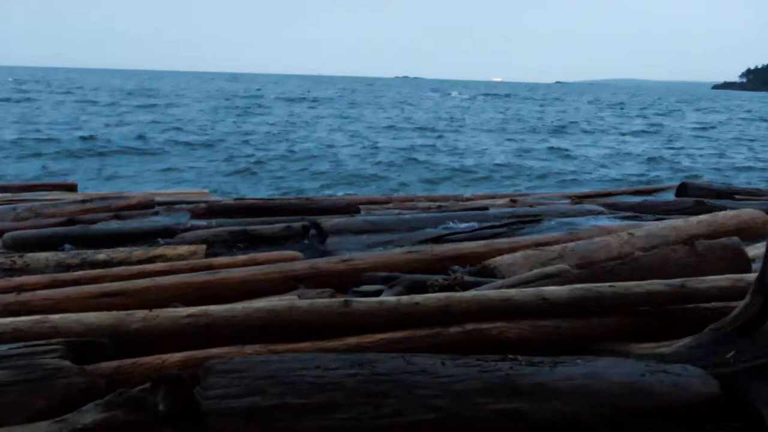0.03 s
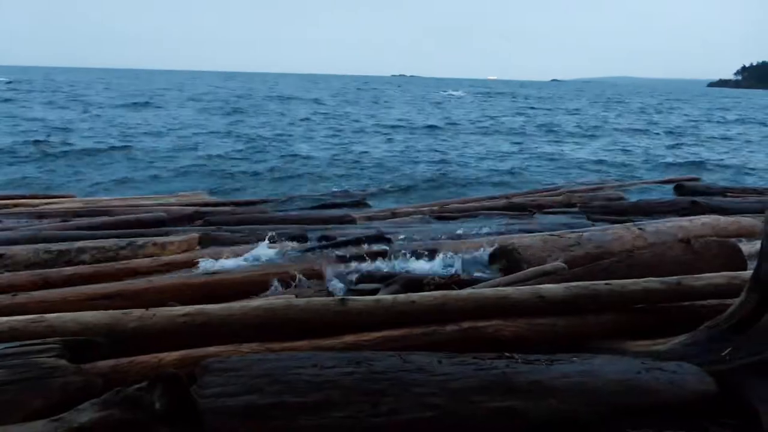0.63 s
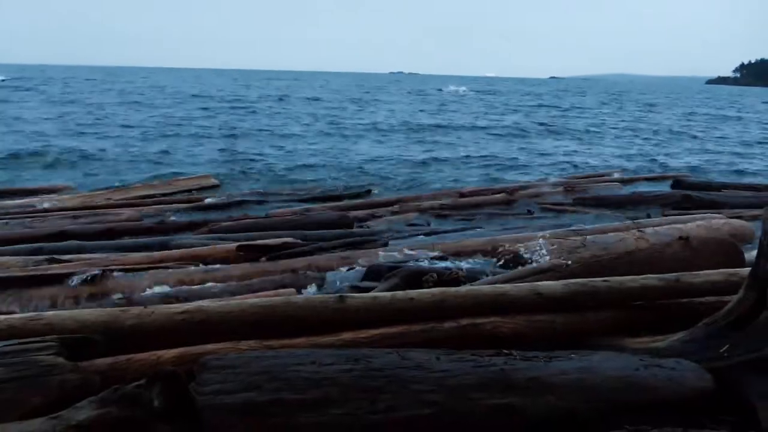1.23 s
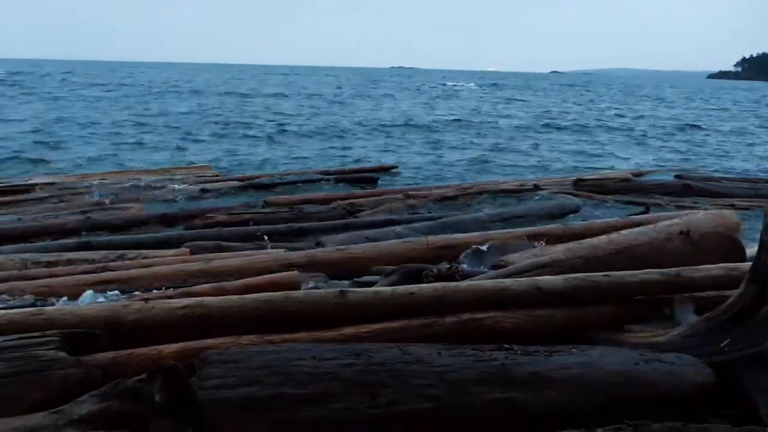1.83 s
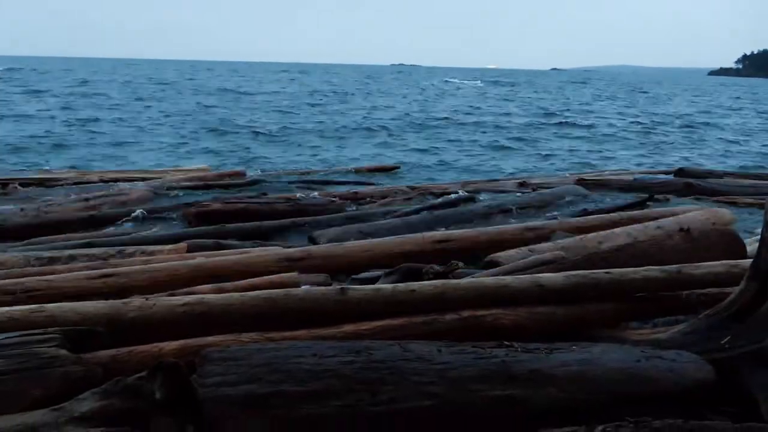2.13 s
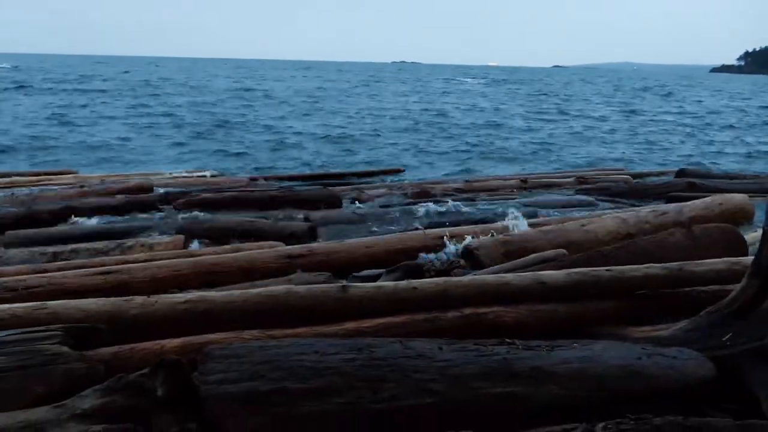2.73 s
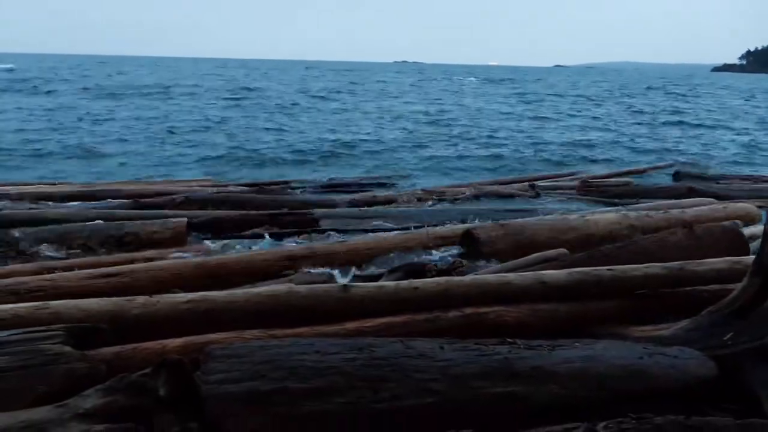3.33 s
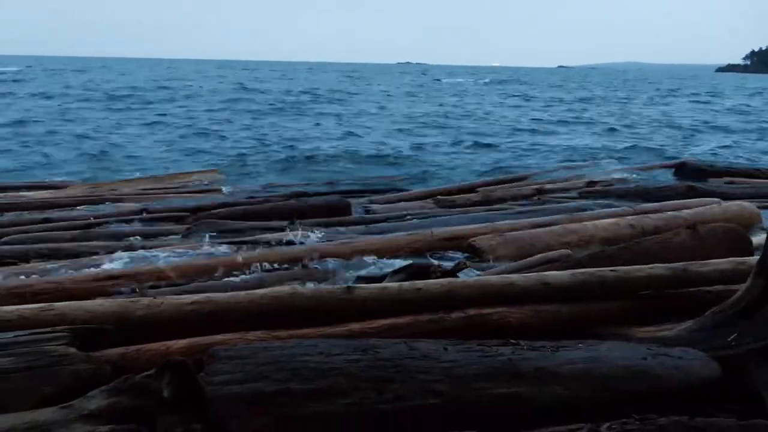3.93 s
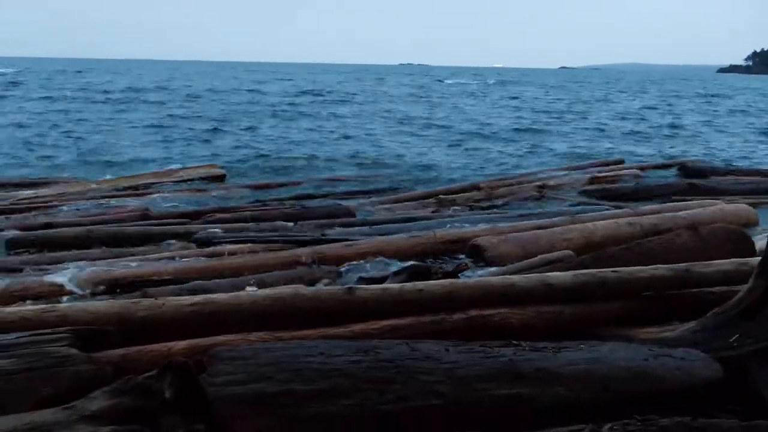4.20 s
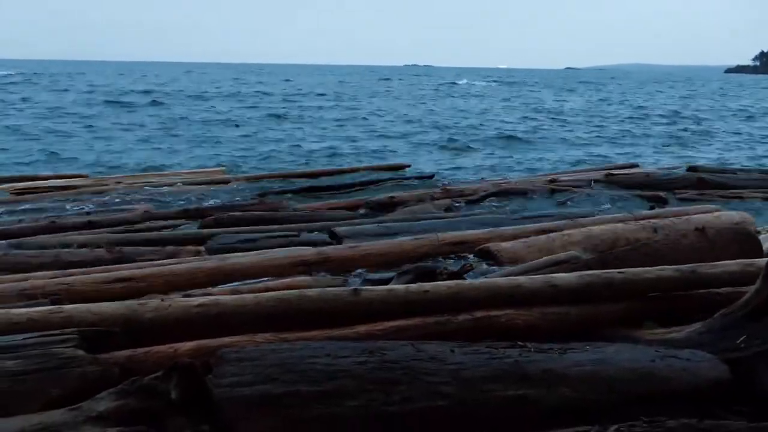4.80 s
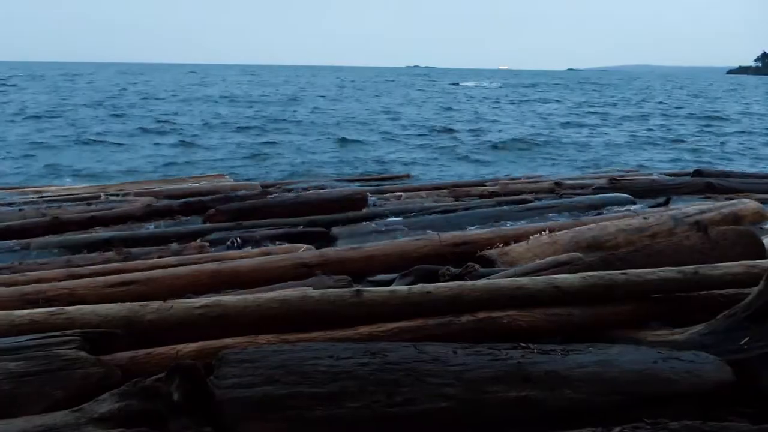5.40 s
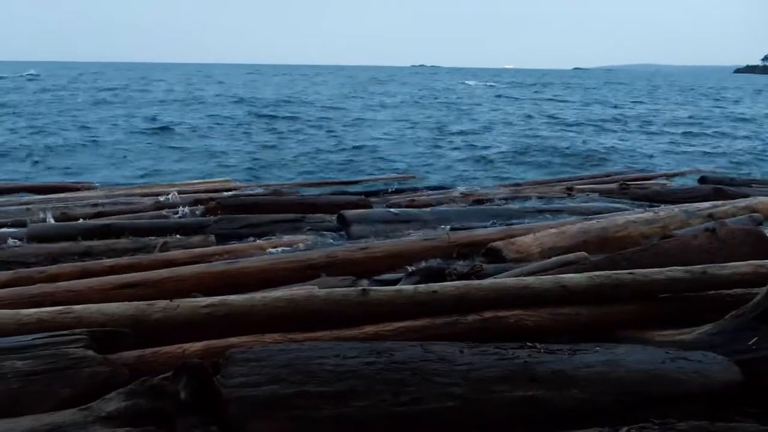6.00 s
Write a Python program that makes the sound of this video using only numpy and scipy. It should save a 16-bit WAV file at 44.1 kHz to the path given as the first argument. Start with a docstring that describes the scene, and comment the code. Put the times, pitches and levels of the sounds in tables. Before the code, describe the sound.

Choppy sea churns and bubbles through a raft of drift logs on a windy shore. The wash swells with several small waves, the first the strongest, each leaving a fizz of foam. Water slaps hollowly against the trunks, with a few small drips and thin spits of spray, busiest around the middle. Wind flutters on the stereo microphone throughout, with irregular dull low thumps.

```python
"""On a windy shore, choppy sea washes through a raft of drift logs, heard from half a second in.
Wind eddies thump on the microphone ports. Thrown drops ring small bubbles, spray hisses, and waves
slap the trunks, made hollow by the echo off the next log. The water itself churns, bubbles and fizzes:
turbulent noise mixed with damped bubble resonances, swelling with each wave.
The camera's frequency response cuts three narrow notches into the whole sound."""
import sys
import numpy as np
from scipy import signal
from scipy.fft import rfft, irfft, next_fast_len
from scipy.io import wavfile
from scipy.ndimage import uniform_filter1d, map_coordinates

SR = 44100
rng = np.random.default_rng(int(sys.argv[2]) if len(sys.argv) > 2 else 0)


def unload_audio(sound):
    """Save the sound as a 16-bit wav file, at the path given as the first command line argument."""
    columns = np.transpose(np.atleast_2d(sound))
    # keep every value between -1 and 1, then stretch to whole-number steps
    steps = np.round(np.clip(columns, -1, 1) * 32767)
    wavfile.write(sys.argv[1], SR, steps.astype(np.int16))


N = 271215
TIME = np.arange(N) / SR


def amp(db):
    """Decibels to amplitude ratio."""
    return 10 ** (np.asarray(db) / 20)


def unit(x):
    """Normalisation to rms 1."""
    return x / np.sqrt(np.mean(x ** 2) + 1e-20)


def along(points, hz):
    """Interpolation of (frequency [Hz], value) points on a logarithmic frequency axis."""
    freqs, values = np.transpose(points)
    return np.interp(np.log(hz + 1), np.log(freqs + 1), values)


def wobble(rate):
    """Smooth random modulation: a spline through `rate` Gaussian knots a second."""
    knots = rng.standard_normal(int(N * rate / SR) + 4)
    return map_coordinates(knots, [TIME * rate])


def filtered(x, response):
    """Linear filtering: the spectrum of x times a frequency response."""
    size = next_fast_len(N + SR // 2)
    return irfft(rfft(x, size) * response(np.fft.rfftfreq(size, 1 / SR)), size)[..., :N]


def panned(lr_db):
    """Intensity stereo: left and right gains for a level difference."""
    return amp(np.array([lr_db, -lr_db]) / 2).reshape(2, -1)


def add(out, start, sound):
    """Superposition of a sound from `start` seconds on."""
    part = out[:, round(start * SR):][:, :sound.shape[-1]]
    part += sound[..., :part.shape[-1]]


def patchy(depth_db):
    """Spectral modulation: two noises whose level varies in patches of time and frequency."""
    spectra = signal.stft(rng.standard_normal((2, N)), nperseg=512)[2]
    patches = uniform_filter1d(rng.standard_normal(spectra.shape[1:]), size=8, axis=0)
    patches = uniform_filter1d(patches, size=7, axis=1)
    return unit(signal.istft(spectra * amp(depth_db * unit(patches)), nperseg=512)[1][:, :N])


def spread(pair, spectrum, coherence):
    """Mid-side mixing: two unrelated signals become coloured, partly coherent stereo of rms 1."""
    def response(hz):
        angle = np.arccos(np.clip(along(coherence, hz), -1, 1)) / 2
        return amp(along(spectrum, hz)) * np.array([np.cos(angle), np.sin(angle)])
    mid, side = filtered(pair, response)
    return unit(np.array([mid + side, mid - side]))


# strength of the wind on the ports (time [s], level [dB])
WIND_LEVELS = [(0.5, -31), (0.68, -24.5), (1.05, -27), (1.85, -25), (2.05, -29.5), (2.15, -25),
               (2.23, -30.5), (2.33, -31.5), (2.42, -21.5), (2.55, -29.6), (2.73, -24.5), (2.98, -27.5),
               (3.03, -31.3), (3.53, -26), (5.78, -28.9), (5.83, -25.9), (6.1, -32.5), (6.15, -30)]
# spectrum of its buffeting (frequency [Hz], relative density [dB])
WIND_SPECTRUM = [(25, -34), (50, -20), (85, -5), (130, 2.5), (220, 1), (310, -0.5), (370, -5.5), (460, -10),
                 (550, -23), (800, -19.5), (2000, -64)]
# likeness of left and right (frequency [Hz], coherence [0-1])
WIND_COHERENCE = [(30, .4), (80, 0.84), (200, 0.88), (400, 0.58)]
# strong eddies (time [s], envelope peak [dB], frequency [Hz], left minus right [dB])
EDDIES = [(1.3, -13, 226, -7), (1.499, -15, 174, -3), (1.585, -19, 264, -5), (1.759, -17.5, 215, 1),
          (1.851, -18.5, 220, -12), (2.025, -17.5, 215, 8), (2.142, -18.5, 264, -14),
          (3.249, -16.5, 170, 5), (3.533, -14.5, 170, 4), (3.822, -17.5, 230, .5), (4.212, -10, 266.6, 3),
          (4.319, -19, 271, 2), (4.554, -11, 270, 0), (4.783, -21.5, 203, 0), (5.024, -17.5, 275, -3),
          (5.203, -18, 285, 5), (5.285, -17, 230, -11.5), (5.474, -20, 202, 9), (5.566, -16, 150, 3),
          (5.939, -14.5, 200, -8)]


def wind():
    """Turbulent pressure flutters on the ports; each strong eddy is a dull thump that drags a wake."""
    wake_db, wake_lag_s, wake_half_width_s = -27.5, 0.0086, 0.022
    wakes = sum(np.exp(-((TIME - start - wake_lag_s) / wake_half_width_s) ** 2) for start, *_ in EDDIES)
    wind_db = np.interp(TIME, *np.transpose(WIND_LEVELS)) + 0.39 * wobble(21.91)
    strength = np.hypot(amp(wind_db), amp(wake_db) * wakes)
    flutter = unit(amp(2.1 * wobble(130))) * rng.standard_normal((2, N))
    out = strength * panned(-.8) * spread(flutter, WIND_SPECTRUM, WIND_COHERENCE)
    t = np.arange(SR // 20) / SR
    age = t / 0.0088
    push = (age * np.exp(1 - age)) ** 5  # lasts two or three cycles
    for start, db, hz, lr_db in EDDIES:
        add(out, start, amp(db) * panned(lr_db) * push * np.sin(2 * np.pi * hz * t))
    return out


# thin spits of spray (time [s], level [dB], centre frequency [Hz])
SPITS = [(0.698, -24, 13000), (2.615, -34, 9300), (3.1875, -25, 10100), (3.253, -28, 10850)]


def spray():
    """Each spit is a brief narrow-band hiss: random modulation widens a tone into a band."""
    out, t = np.zeros((2, N)), np.arange(SR // 10) / SR
    envelope = np.exp(-t / 0.004) * (1 - np.exp(-t / 0.0018))
    for start, db, hz in SPITS:
        hiss = wobble(1000)[:len(t)] * np.sin(2 * np.pi * hz * t)
        add(out, start, amp(db) * hiss * envelope)
    return out


# single drops (time [s], level [dB], starting frequency [Hz])
DROPS = [(1.884, -25, 2890), (3.009, -18, 2010), (3.075, -23, 1880), (3.318, -26, 2900), (5.712, -27, 2300)]


def drops():
    """Bubble resonance: each falling drop rings a small bubble, a damped oscillator of rising pitch."""
    out, t = np.zeros((2, N)), np.arange(SR // 10) / SR
    attack = 1 - np.exp(-t / 0.00079)
    for start, db, hz in DROPS:
        ring = np.sin(2 * np.pi * hz * t * (1 + 4.5 * t)) * np.exp(-t * hz / 11)
        add(out, start, amp(db) * ring * attack)
    return out


def bubbles(low_hz, high_hz, cycles, scatter_db, count, samples):
    """Free oscillation of many bubbles: two streams of damped pings of random pitch and strength."""
    when, pitch, strength, life = rng.random((count, 4)).T[:, :, None]
    hz = low_hz + (high_hz - low_hz) * pitch
    turns = hz * np.arange(samples) / SR
    age = turns / (cycles * (.5 + life))
    rise = 1 + 0.037 * np.minimum(age, 2)  # a bubble's pitch climbs as it nears the surface
    pings = np.sin(2 * np.pi * turns * rise) * np.exp(-2 * age)
    pings *= amp(-scatter_db * np.log(0.027 + strength))
    positions = (when * 2 * N).astype(int) + np.arange(samples)
    stream = np.bincount(positions.ravel(), pings.ravel(), 2 * N)
    return unit(stream[:2 * N].reshape(2, N))


# likeness of left and right for slaps and wash (frequency [Hz], coherence [0-1])
WATER_COHERENCE = [(500, 0.77), (1200, 0.71), (2500, 0.64), (4500, 0.84), (7500, 0.98), (10000, 0.79),
                   (15000, .55)]
# spectrum of a slap's crackle (frequency [Hz], relative density [dB])
SLAP_SPECTRUM = [(300, -22), (700, -3.5), (1200, 5), (2000, -2), (2900, -2), (3700, 0.5), (5300, 0.5),
                 (7800, -5.5), (9600, 0.5), (15000, -1)]
# water slapping a log (peak time [s], level [dB], duration [s], low-pass cutoff [Hz])
SLAPS = [(0.682, -27, 0.038, 3260), (1.881, -35, 0.0093, 7000), (2.126, -34, 0.043, 3700),
         (2.638, -42, 0.081, 6000), (2.936, -29, 0.03, 6300), (3.002, -26.5, 0.026, 6000),
         (3.243, -34, 0.033, 6500), (3.324, -33.5, 0.011, 6000), (3.78, -36, 0.081, 3000),
         (4.858, -40.5, 0.081, 4500), (5.083, -35, 0.019, 4600), (5.147, -29.5, 0.043, 3700),
         (5.768, -36, 0.023, 6000)]


def slaps():
    """Comb filtering: water crackles against a trunk, made hollow by the echo off the next one."""
    echo_s, echo_gain = .001125, .85
    noise = patchy(depth_db=1.5)
    pings = bubbles(low_hz=1800, high_hz=9000, cycles=4, scatter_db=3, count=12000, samples=150)
    crackle = spread(noise + amp(-7) * pings, SLAP_SPECTRUM, WATER_COHERENCE)
    hollow = filtered(crackle, lambda hz: 1 + echo_gain * np.exp(-2j * np.pi * hz * echo_s))
    out = np.zeros((2, N))
    for peak, db, duration, cutoff_hz in SLAPS:
        near = np.abs(TIME - peak) < .1
        softened = signal.sosfilt(signal.butter(2, cutoff_hz, fs=SR, output="sos"), hollow[:, near])
        swell = np.exp(-np.abs(2 * (TIME[near] - peak) / duration) ** 3)
        out[:, near] += amp(db) * swell * unit(softened)
    return out


def surge(crest, run, release_s, build_s=0.32, sag_db_per_s=4.5):
    """Exponential growth and decay: a wave's gain builds to its crest, sags as it runs, then dies away."""
    age = TIME - crest
    building = np.exp(np.minimum(age, 0) / build_s)
    sagging = amp(-sag_db_per_s * np.maximum(age, 0))
    return building * sagging * np.exp(-np.maximum(age - run, 0) / release_s)


# waves crossing the raft (crest time [s], run [s], churn [dB], foam [dB], left minus right [dB])
WAVES = [(0.68, 0.66, -31.5, -38.5, -1), (1.62, 0.25, -33.5, -41, -3), (2.93, 0.62, -36, -42, 5.5),
         (3.74, 0.65, -34.5, -41, 8), (5.15, 0.091, -40, -52, -2)]


def sea_levels():
    """Incoherent sources add in power: churn, foam and left-right balance of lapping and waves, in dB."""
    lap_churn_db, lap_foam_db, lap_lr_db = -34, -41, -0.5
    churn_power, foam_power = amp(lap_churn_db) ** 2, amp(lap_foam_db) ** 2
    weighted_lr = churn_power * lap_lr_db
    for crest, run, churn_db, foam_db, lr_db in WAVES:
        wave_power = (amp(churn_db) * surge(crest, run, release_s=0.15)) ** 2
        churn_power += wave_power
        weighted_lr += wave_power * lr_db  # the loudest water sets the direction
        foam_power += (amp(foam_db) * surge(crest, run, release_s=0.28)) ** 2  # foam outlasts its wave
    return 10 * np.log10(churn_power), 10 * np.log10(foam_power), weighted_lr / churn_power


# spectra of churning water and of foam (frequency [Hz], relative density [dB])
CHURN_SPECTRUM = [(150, -36), (450, -9), (700, -0.5), (1200, 0), (1700, -2.5), (2400, -6), (3600, -13.5),
                  (6000, -20.5), (15000, -55)]
FOAM_SPECTRUM = [(800, -20), (2500, -1), (3700, 1), (5400, -1.5), (6600, -4), (7900, -8), (9900, -4.5),
                 (11500, -8.5), (13500, -9.5), (15800, -13)]


def wash(churn_db, foam_db, lr_db):
    """Turbulence and bubble resonance: water churns between the logs; its foam fizzes with tiny bursts."""
    slosh = wobble(28)
    gurgle = bubbles(low_hz=1000, high_hz=3600, cycles=10, scatter_db=3, count=5000, samples=700)
    fizz = bubbles(low_hz=2150, high_hz=14300, cycles=3.8, scatter_db=2.5, count=16000, samples=100)
    tinkle = bubbles(low_hz=2197, high_hz=12170, cycles=39, scatter_db=2.0, count=2500, samples=900)
    churn = spread(patchy(depth_db=1.1) + amp(-14) * gurgle, CHURN_SPECTRUM, WATER_COHERENCE)
    froth = patchy(depth_db=1.1) + amp(-9.5) * fizz + amp(-17) * tinkle
    foam = spread(froth, FOAM_SPECTRUM, WATER_COHERENCE)
    # fresh, thick foam has the finest bubbles, so it hisses brighter
    finest = filtered(foam, lambda hz: 1 - 1 / (1 + (hz / 9000) ** 4))
    foam += finest * (amp(0.95 * (foam_db - foam_db.mean())) - 1)
    churn *= amp(churn_db + 0.5 * slosh + 0.22 * wobble(60)) * panned(lr_db)
    foam *= amp(foam_db + 0.75 * slosh + 0.97 * wobble(90)) * panned(0.3 * lr_db)
    return churn + foam


def scene():
    """Superposition of sea and wind; the slaps come from where the water is busiest."""
    churn_db, foam_db, lr_db = sea_levels()
    return wash(churn_db, foam_db, lr_db) + slaps() * panned(lr_db) + drops() + spray() + wind()


# dips in the camera's response (centre frequency [Hz], width [Hz], depth [0-1])
NOTCHES = [(590, 70, .65), (868, 80, .68), (2670, 190, .68)]


def record(dry):
    """Filters in series: the camera's notches, an abrupt start and a low-pass band limit."""
    start_s, top_hz = .494, 15850

    def notches(hz):
        return np.prod([1 - depth * 1j * hz * width / (centre ** 2 - hz ** 2 + 1j * hz * width)
                        for centre, width, depth in NOTCHES], axis=0)
    gated = filtered(dry, notches) * (TIME >= start_s)
    low_pass = signal.firwin(401, top_hz, fs=SR)
    return signal.fftconvolve(gated, low_pass[None], mode="same", axes=1)


dry = scene()
out = record(dry)
unload_audio(out)
```